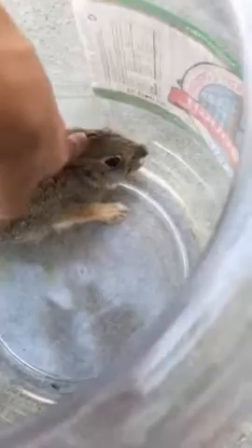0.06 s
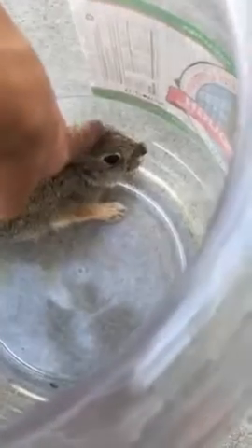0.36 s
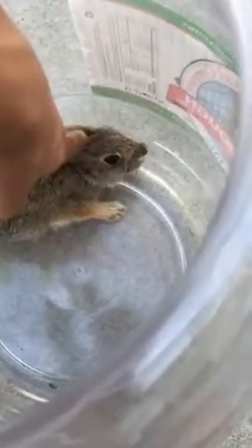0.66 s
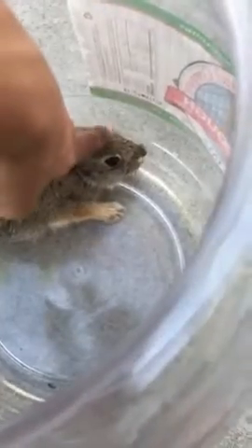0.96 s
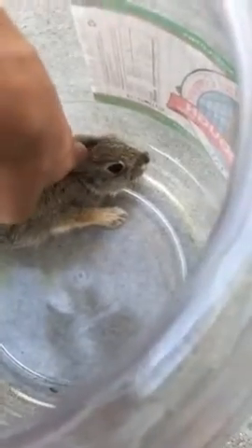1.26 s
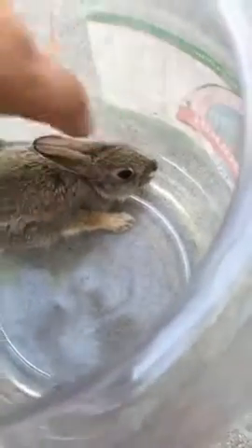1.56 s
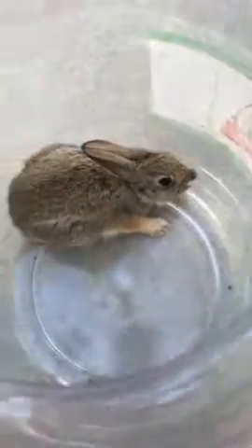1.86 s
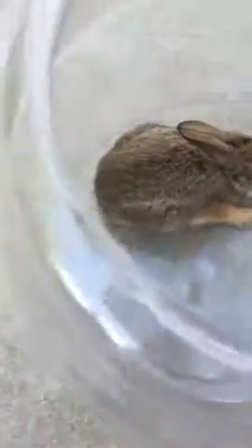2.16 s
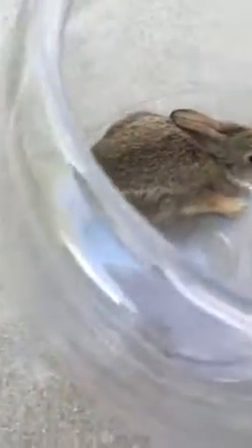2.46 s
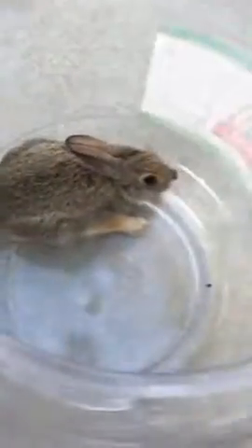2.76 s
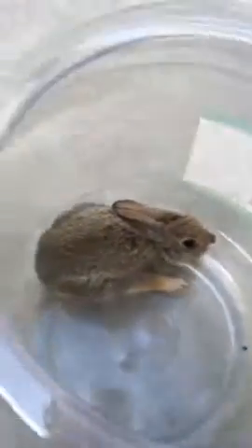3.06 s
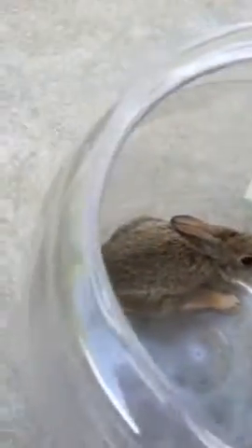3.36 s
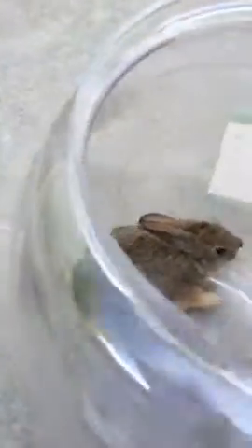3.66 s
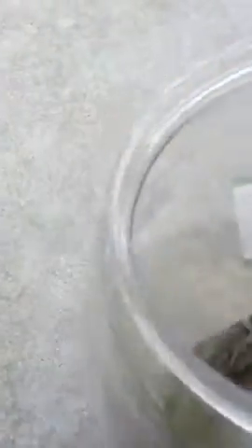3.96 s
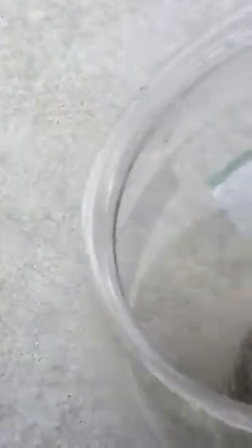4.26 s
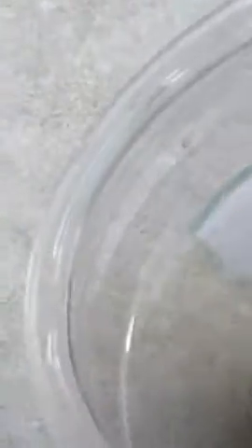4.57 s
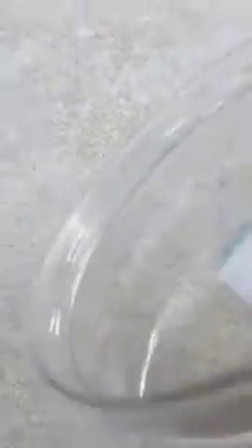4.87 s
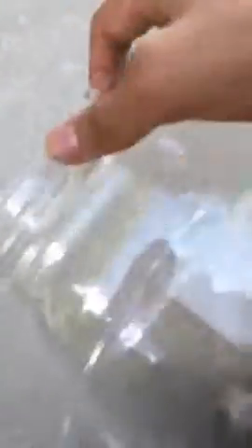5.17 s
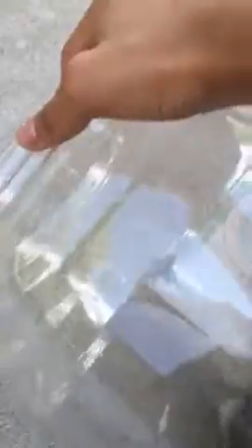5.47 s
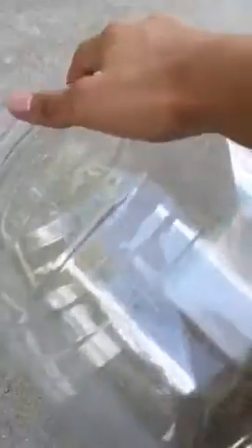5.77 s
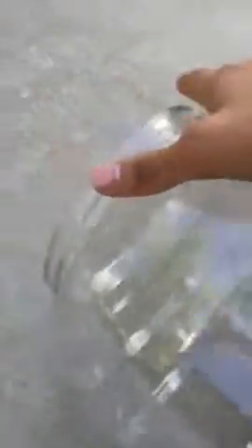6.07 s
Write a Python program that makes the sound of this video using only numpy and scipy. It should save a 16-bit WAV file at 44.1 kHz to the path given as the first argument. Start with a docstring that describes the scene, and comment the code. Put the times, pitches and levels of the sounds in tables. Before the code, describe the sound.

A low, steady outdoor rumble with a faint wash of distant traffic runs throughout, along with a barely audible, high, insect-like trill. At about 1.8 seconds a hand clips a big thin plastic jar close to the microphone: two quick, bright snaps with a small hollow thump. Fingers rustle very faintly on the plastic until 3 seconds. From 3.5 to 3.7 seconds the jar shifts with several light taps and a brief gritty scrape on concrete, and sand grains tick around 4.2 seconds. At 4.5 seconds it lands on its side with one hollow knock, by far the loudest sound, leaving a short low hum. Dry ticks and lighter taps follow until 5 seconds, then a dull thump at 5.3 and soft, low handling bumps around 5.5 and 6 seconds. The traffic rumble swells a little towards the end, just after 6 seconds.

```python
"""Outdoors on concrete, a big clear plastic jar stands close to a phone. A hand clips it twice, shifts it
and tips it over: the thin wall snaps, grit ticks underneath, the base scrapes, and the side lands with
one hollow knock that leaves the air inside humming. Fingers rustle and bump on the plastic.
A low rumble, a wash like distant traffic and a faint insect-like trill run under it all."""
import sys
import numpy as np
from scipy import signal
from scipy.fft import rfft, irfft
from scipy.io import wavfile
from scipy.ndimage import uniform_filter1d, minimum_filter1d

SR = 44100
rng = np.random.default_rng(int(sys.argv[2]) if len(sys.argv) > 2 else 0)


def dump_mix(stems):
    """Bounce the given channels to the path in sys.argv[1] as a 16-bit WAV at rate SR."""
    frames = np.atleast_2d(stems).T  # one column per channel
    limited = np.clip(frames, -1, 1)  # hard clip at full scale
    pcm = np.round(limited * 32767).astype(np.int16)
    wavfile.write(sys.argv[1], SR, pcm)


N = 274326
TIME = np.arange(N) / SR  # seconds into the scene
RING = np.arange(SR) / SR  # seconds after a hit
BIN_HZ = np.fft.rfftfreq(N, 1 / SR)
LANDING_S = 4.4805  # the jar falls on its side


def undb(db):
    """Decibels to gain."""
    return 10 ** (np.asarray(db) / 20)


def unit(x):
    """Scale to rms 1."""
    return x / np.sqrt(np.mean(x ** 2))


def at_level(hit, db):
    """Give the first 30 ms of a hit this rms level."""
    return hit * undb(db) / np.sqrt(np.mean(hit[:int(.03 * SR)] ** 2))


def add(out, start_s, x):
    """Mix x in from start_s."""
    i = int(start_s * SR)
    out[i:i + len(x)] += x[:N - i]


def decay(t60):
    """A one-second envelope that falls 60 dB in t60 seconds."""
    return np.exp(-np.log(1000) * RING / max(t60, 1e-3))


def modes(table):
    """Damped sines; neighbouring modes swing in opposite directions."""
    return sum((-1) ** k * undb(db) * decay(t60) * np.sin(2 * np.pi * hz * RING)
               for k, (hz, db, t60) in enumerate(table))


def wall_eq(x, centre_hz, slope_db):
    """Roll off both sides of centre_hz; the thin wall also loses bass and the highest treble."""
    size = len(x)
    hz = np.maximum(np.fft.rfftfreq(size, 1 / SR), 1)
    focus_db = -abs(slope_db) * np.abs(np.log2(hz / centre_hz))
    bass_db = 9 * np.clip(np.log2(hz / 650), -3, 0)
    treble_db = -7.6 * np.maximum(np.log2(hz / 5600), 0)
    # minimum phase, so nothing rings ahead of the attack
    cepstrum = irfft(np.log(undb(focus_db + bass_db + treble_db)), size)
    cepstrum[1:size // 2] *= 2
    cepstrum[size // 2 + 1:] = 0
    return irfft(rfft(x) * np.exp(rfft(cepstrum)), size)


def soften(x, contact_s):
    """A soft contact spreads the blow over time."""
    pulse = np.sin(np.pi * np.minimum(RING[:512] / contact_s, 1)) ** 2
    return signal.lfilter(pulse / pulse.sum(), 1, x)


def grit(size, spread_db):
    """Dense tiny slips of unequal size."""
    return unit(rng.standard_normal(size) * undb(spread_db * np.minimum(rng.exponential(size=size), 4)))


def crackle(t60, rise_s):
    """A gritty burst bounces round the jar: it builds for a moment, then fades."""
    return grit(SR, spread_db=1.5) * decay(t60) * (1 - .5 * np.exp(-RING / rise_s))


def drift(rate_hz):
    """Smooth random modulation, rms 1."""
    hold = int(SR / rate_hz)
    steps = np.repeat(rng.standard_normal(N // hold + 1), hold)
    return unit(uniform_filter1d(uniform_filter1d(steps, hold), hold)[:N])


def stroke(start_s, length_s, db, attack_s=.027, release_s=.028, growth_db=3.5):
    """Envelope of one hand move: it presses harder towards its end, staying a little under db."""
    elapsed = TIME - start_s
    gate = np.interp(elapsed, [0, min(attack_s, length_s), length_s, length_s + release_s], [0, 1, 1, 0])
    progress = np.clip(elapsed / length_s, 0, 1)
    return gate * undb(db + growth_db * (progress - 1.5))


# tone curve of the outdoor bed, applied within each band: frequency_hz, gain_db
AIR_CURVE = [(13, -53), (22, -22.5), (29, -38), (39, -2.5), (70, 5.5), (155, -5.5), (204, -11),
             (235, -17.5), (300, -17.5), (454, -29), (1700, -32.5), (2720, -46.5), (6500, -54), (7730, -59),
             (9110, -58.5), (10400, -66.5), (11500, -63.5), (15800, -68)]
# its bands (rumble, hum, drone, low wash, high wash, hiss): low_hz, high_hz
AIR_BANDS = [(22, 115), (115, 220), (220, 450), (450, 1000), (1000, 2400), (2400, 16000)]
# steady floor of each band: level_db
FLOOR_DB = [-44, -50.5, -62.5, -66.5, -66.5, -67.5]
# one distant vehicle leaving, one coming: nearest_s, half_power_s, then level_db per band when nearest
VEHICLES = [(.2, 0.74, -67, -44, -73, -60, -62.5, -83.5), (6.0, 0.89, -44, -58.5, -51, -65.5, -57, -73.5)]
# bass swells as the jar or the phone is moved: start_s, length_s, gain_db
BASS_SWELLS = [(1.75, 0.25, -45), (3.55, 0.29, -43), (5.217, .46, -40), (5.997, 0.24, -38)]


def outdoors():
    """A bed of rumble and hiss; vehicles swell and fade with distance, and the low bands flutter most."""
    hz = np.maximum(BIN_HZ, 1)
    curve_hz, curve_db = np.transpose(AIR_CURVE)
    tone = undb(np.interp(np.log(hz), np.log(curve_hz), curve_db))
    out = np.zeros(N)
    for k, (low_hz, high_hz) in enumerate(AIR_BANDS):
        bandpass = 1 / np.sqrt((1 + (low_hz / hz) ** 12) * (1 + (hz / high_hz) ** 12))
        band = unit(irfft(rfft(rng.standard_normal(N)) * tone * bandpass, N))
        power = undb(FLOOR_DB[k]) ** 2
        for nearest_s, half_power_s, *band_db in VEHICLES:
            power += undb(band_db[k]) ** 2 / (1 + ((TIME - nearest_s) / half_power_s) ** 2)
        if k == 0:
            power += sum(stroke(*swell) ** 2 for swell in BASS_SWELLS)
        flutter_db = 1.3 if high_hz < 300 else .4
        out += band * np.sqrt(power) * undb(flutter_db * drift(rate_hz=14))
    return out


# glide of the high trill: time_s, pitch_hz
TRILL_GLIDE = [(0, 8900), (1.8, 9020), (2.3, 8990), (6.22, 9100)]


def trill(width_hz=190, level_db=-83.5, pulse_hz=19.5, depth=.22, growth_db_per_s=1.1):
    """A thin, pulsing band of noise, like an insect, that creeps up in pitch and level."""
    flicker = irfft(rfft(rng.standard_normal(N)) / (1 + (BIN_HZ / width_hz) ** 2), N)
    pitch_hz = np.interp(TIME, *np.transpose(TRILL_GLIDE))
    carrier = np.sin(2 * np.pi * np.cumsum(pitch_hz) / SR)
    tremolo_hz = pulse_hz * (1 + .05 * drift(rate_hz=3))
    tremolo = 1 + depth * np.sin(2 * np.pi * np.cumsum(tremolo_hz) / SR)
    return undb(level_db) * unit(carrier * flicker * tremolo * undb(growth_db_per_s * TIME))


# fingers sliding on the plastic: start_s, length_s, gain_db
FINGER_SLIDES = [(1.33, 0.094, -69.5), (2.03, .05, -71), (2.11, .05, -73), (2.33, .15, -67),
                 (2.53, 0.11, -69), (2.66, .13, -67.5), (2.82, 0.2, -66), (3.488, 0.081, -63.5),
                 (3.666, .05, -63), (4.475, 0.28, -67.5), (4.722, .17, -65), (6.08, 0.18, -67)]


def finger_rub():
    """Skin slides over the smooth wall in uneven strokes with a faint, bright rustle."""
    rustle = unit(wall_eq(grit(N, spread_db=2), centre_hz=11000, slope_db=2))
    pressure = sum(stroke(*slide) for slide in FINGER_SLIDES)
    return rustle * pressure * undb(1.4 * drift(rate_hz=25))


# bright ring of the thin wall: pitch_hz, gain_db, t60_s
WALL_MODES = [(955, 1, .09), (1250, -2, .07), (1465, -1, .06), (1650, -3, .035), (1840, 0, .04),
              (2130, -5, .025), (2920, 4, .04), (3380, 1, .035), (4520, -4, .035), (4900, -4, .03),
              (5270, -2, .04), (5990, 3, .03), (6510, -3, .055), (7020, -4, .03), (8730, -4, .03),
              (11000, -4, .03)]


def wall_snap(centre_hz, slope_db, crack_db=3):
    """The wall cracks and rings; every spot favours other modes and detunes them a little."""
    mode_hz, mode_db, t60 = np.transpose(WALL_MODES)
    detune, favour = rng.standard_normal((2, len(WALL_MODES)))
    # a dull contact hardly wakes the high modes
    dull_db = 1.3 * slope_db * np.maximum(np.log2(mode_hz / centre_hz), 0)
    spot = zip(mode_hz * (1 + .004 * detune), mode_db + 2 * favour - dull_db, t60)
    ring = modes(spot) * (1 - decay(t60=.01))
    crack = crackle(t60=.033, rise_s=.005)
    return wall_eq(at_level(ring, 0) + at_level(crack, crack_db), centre_hz, slope_db)


# ring of the stiff base: pitch_ratio, gain_db, t60_s
BASE_MODES = [(1, 0, .08), (.91, -9, .045)]


def base_ring(start_s, upright_hz=805, tipped_hz=738, sag_hz_per_s=53):
    """The base rings lower once the jar lies on its side, and lower still as it is tilted on."""
    pitch_hz = upright_hz if start_s < LANDING_S else tipped_hz - sag_hz_per_s * (start_s - LANDING_S)
    pickup = 1 - decay(t60=.018)  # it takes a few cycles to follow the wall
    return modes([(pitch_hz * ratio, db, t60) for ratio, db, t60 in BASE_MODES]) * pickup


# low thump of the jar flexing under a tap: pitch_hz, gain_db, t60_s
FLEX_MODES = [(122, -2, 0.12), (177, 5.5, 0.098), (217.8, 0.5, 0.17), (242, -4, 0.091)]
# taps on the jar: start_s, wall_db, centre_hz, slope_db_per_octave, base_db, thump_db
JAR_TAPS = [ (1.7961, -39.5, 3370, 6.5, -43, -34), (1.8295, -62, 3600, 5, -53, -43),
            (1.8601, -44, 3950, 6.5, -37.5, -40), (3.5156, -51, 1770, 9, -49.5, -63),
            (3.5695, -58, 1600, 9, -54.5, -46.5), (3.602, -53, 1630, 3.5, -63, -45),
            (3.7162, -45, 1760, 10, -53, -33), (4.4764, -43, 1750, 16.5, -42, -51.5),
            (4.4808, -38.5, 1610, 24.5, -37.5, -30), (4.802, -60, 1200, 6, -56, -41),
            (4.957, -57, 1600, 15, -63, -40.5), (5.2839, -52, 1460, 24, -57, -29),
            (5.6800, -65, 1600, 5, -57.5, -72)]


def taps(hum_hz=208, hum_t60_s=1.2, hum_under_base_db=7):
    """Each tap snaps the wall, flexes the jar and rings the base, which pumps the air in the mouth."""
    out = np.zeros(N)
    thump = soften(modes(FLEX_MODES), contact_s=.0015)
    hum = modes([(hum_hz, 0, hum_t60_s)])
    for start_s, wall_db, centre_hz, slope_db, base_db, thump_db in JAR_TAPS:
        add(out, start_s, at_level(wall_snap(centre_hz, slope_db), wall_db))
        add(out, start_s, at_level(base_ring(start_s), base_db))
        add(out, start_s, at_level(thump, thump_db))
        add(out, start_s, at_level(hum, base_db - hum_under_base_db))
    return out


# grit under the jar: start_s, level_db, centre_hz, slope_db_per_octave (sign ignored)
GRIT_TICKS = [ (1.973, -69.5, 5000, 2), (2.52, -63.5, 2600, 10), (3.5000, -65, 5000, 8),
              (3.8495, -70.5, 9000, 9), (4.147, -61.5, 4530, 16), (4.2325, -50.5, 3800, 6.5),
              (4.479, -61, 6000, 22), (4.7237, -66, 6500, 3), (4.7597, -47.5, 2700, 4),
              (4.8700, -67, 3000, 9), (4.956, -52.5, 4000, -5), (5.149, -76, 11000, 18),
              (5.8980, -56.5, 4900, -2)]


def grit_ticks():
    """Sand grains crack between plastic and concrete: short, dry bursts."""
    out = np.zeros(N)
    for start_s, level_db, centre_hz, slope_db in GRIT_TICKS:
        tick = wall_eq(crackle(t60=.027, rise_s=.01), centre_hz, slope_db)
        add(out, start_s, at_level(tick, level_db))
    return out


# resonances of the dragged base: centre_hz, width_hz, gain_db
RASP_PEAKS = [(1240, 550, 0), (1750, 470, 3), (3440, 390, -15), (4100, 290, -9.5), (6200, 3600, -23)]
# envelope of the drag: time_s, level_db
SCRAPE_ENVELOPE = [(3.645, -68), (3.66, -55), (3.69, -47), (3.703, -44), (3.712, -57), (3.73, -63)]


def base_scrape():
    """Grains of concrete catch the base as it shifts."""
    response = sum(undb(db) / (1 + (2 * (BIN_HZ - hz) / width) ** 2) for hz, width, db in RASP_PEAKS)
    rasp = unit(irfft(rfft(grit(N, spread_db=-1)) * response, N))
    time_s, level_db = np.transpose(SCRAPE_ENVELOPE)
    return rasp * undb(np.interp(TIME, time_s, level_db, left=-np.inf, right=-np.inf))


# hollow boom of the whole jar under a heavy blow: pitch_hz, gain_db, t60_s
BODY_MODES = [(118.7, -6.5, .052), (212.4, 0, .11), (244.1, -5.6, .156), (204, -27, .85)]
# short overtones on top of the boom: pitch_hz, gain_db, t60_s
KNOCK_OVERTONES = [(316, -0.5, 0.091), (391, 0.5, 0.048), (452, -3, 0.089), (575, -13.5, 0.11)]


def landing_knock(body_db=-6, overtone_db=-33.5):
    """The side lands on the concrete: two close body modes beat and die, the air inside hums on."""
    out = np.zeros(N)
    body = soften(modes(BODY_MODES), contact_s=.0012)
    overtones = soften(modes(KNOCK_OVERTONES), contact_s=.0021)
    add(out, LANDING_S, at_level(body, body_db) + at_level(overtones, overtone_db))
    return out


# soft, low handling bumps: start_s, pitch_hz, level_db
GRIP_BUMPS = [(5.392, 102.4, -33.5), (5.506, 66, -37.5), (6.037, 69.6, -35.5)]


def grip_bumps(t60_s=.13):
    """The hand shifts its grip: a few slow, dull cycles."""
    out = np.zeros(N)
    for start_s, pitch_hz, level_db in GRIP_BUMPS:
        bump = soften(modes([(pitch_hz, 0, t60_s)]), contact_s=.0075)
        add(out, start_s, at_level(bump, level_db))
    return out


def scene():
    """The jar up front, the outdoor bed behind it, in mono."""
    jar = taps() + grit_ticks() + landing_knock() + base_scrape() + finger_rub() + grip_bumps()
    return (jar + outdoors() + trill())[None]


def record(dry, limit_db=-2.5, slow_share=.52, top_hz=15900):
    """The phone's limiter ducks the loudest peak and lets go, part fast, part slowly; the top is cut."""
    over_db = np.maximum(20 * np.log10(np.abs(dry) + 1e-9) - limit_db, 0)
    lookahead_db = -minimum_filter1d(-over_db, size=256)
    quick, slow = (np.maximum.accumulate(lookahead_db + db_per_s * TIME, axis=1) - db_per_s * TIME
                   for db_per_s in (348.5, 13.5))
    duck_db = uniform_filter1d(np.maximum(quick, slow_share * slow), size=192)
    lowpass = signal.ellip(8, .2, 70, top_hz, fs=SR, output="sos")
    return signal.sosfilt(lowpass, dry * undb(-duck_db))


dry = scene()
out = record(dry)
dump_mix(out)
```